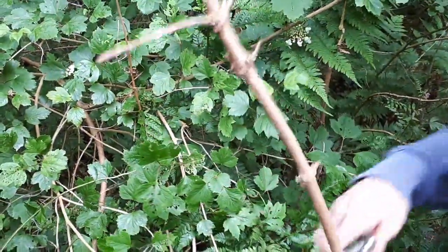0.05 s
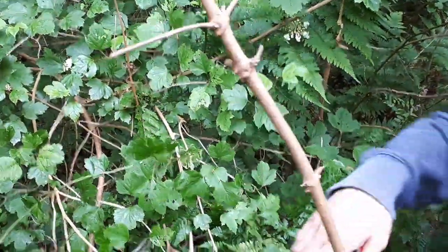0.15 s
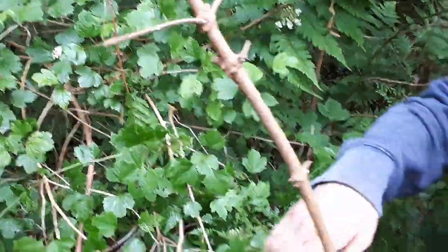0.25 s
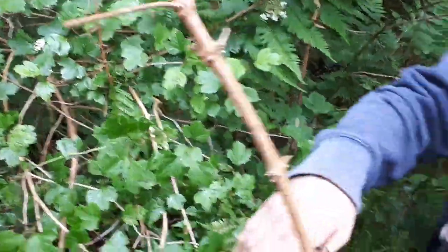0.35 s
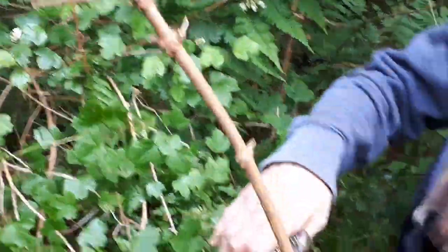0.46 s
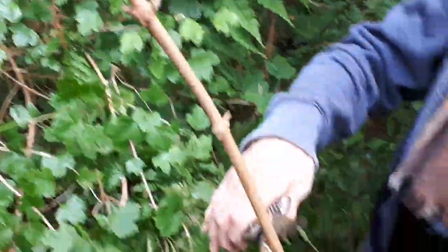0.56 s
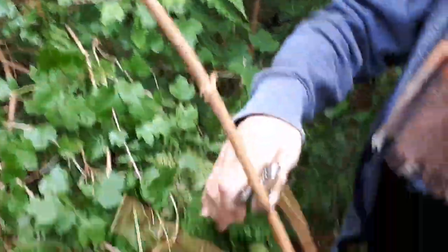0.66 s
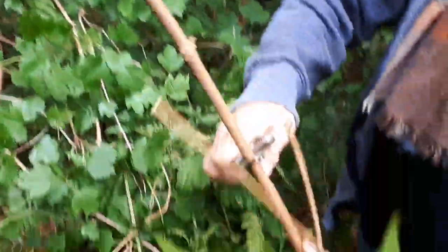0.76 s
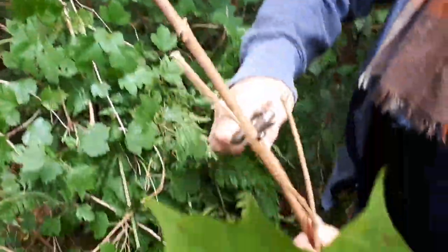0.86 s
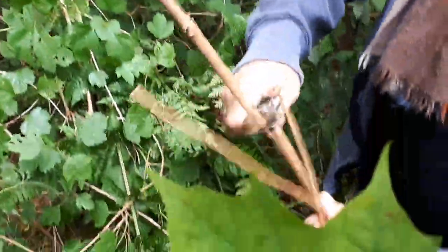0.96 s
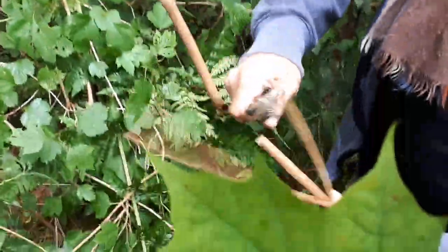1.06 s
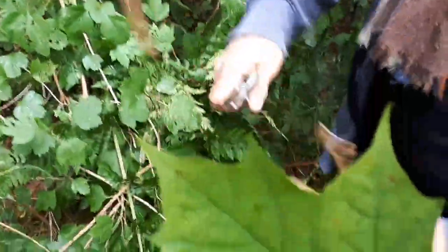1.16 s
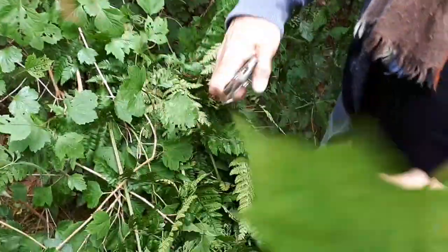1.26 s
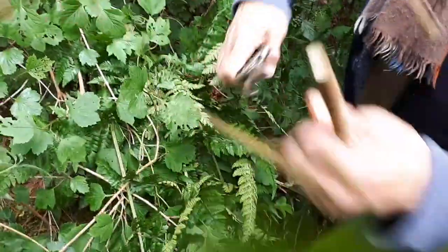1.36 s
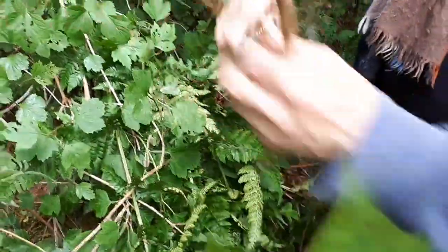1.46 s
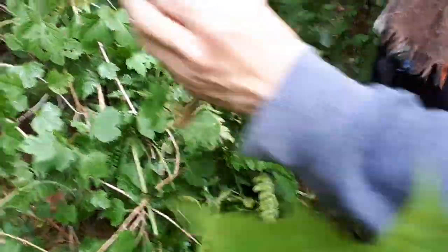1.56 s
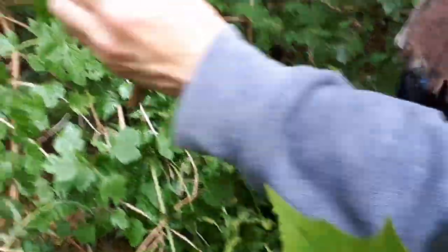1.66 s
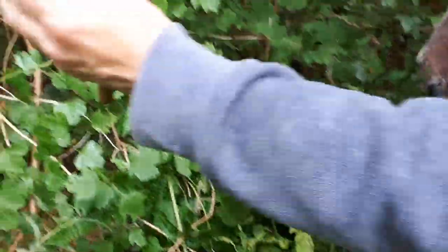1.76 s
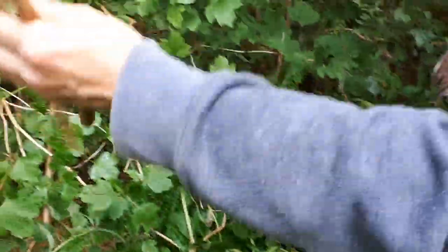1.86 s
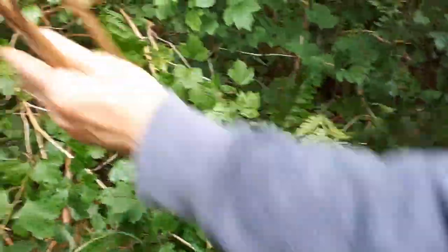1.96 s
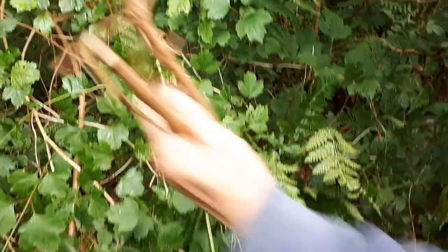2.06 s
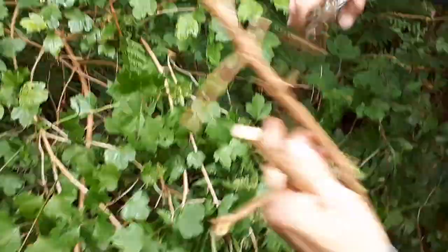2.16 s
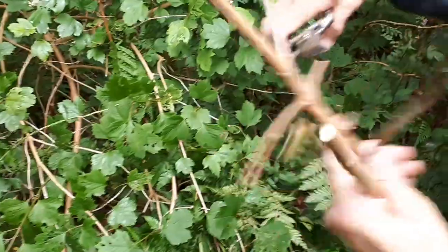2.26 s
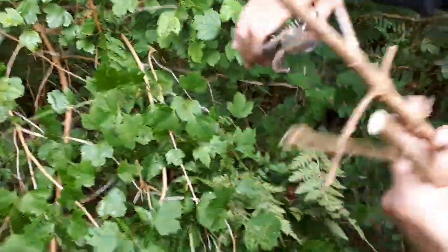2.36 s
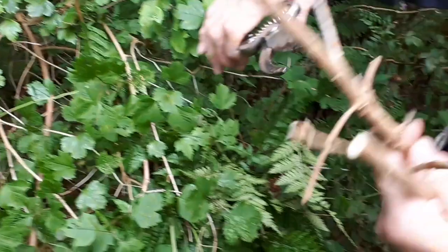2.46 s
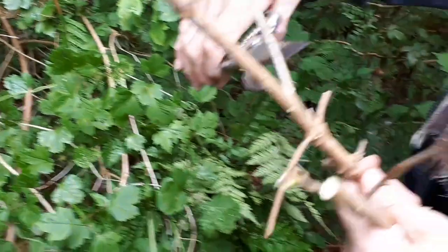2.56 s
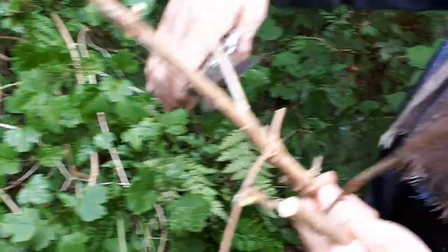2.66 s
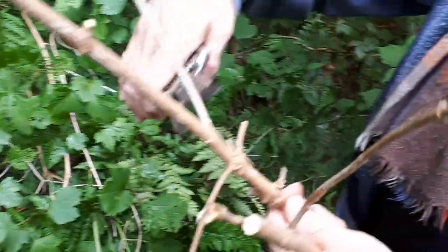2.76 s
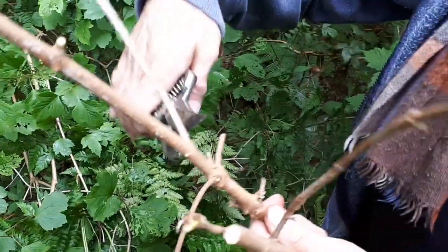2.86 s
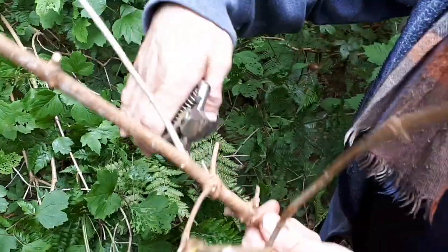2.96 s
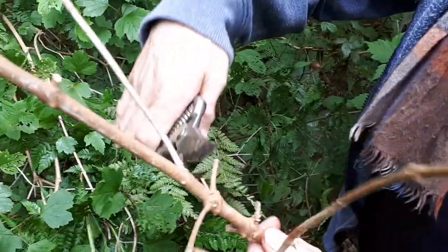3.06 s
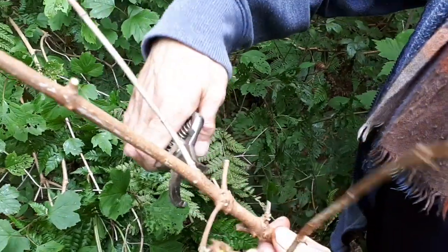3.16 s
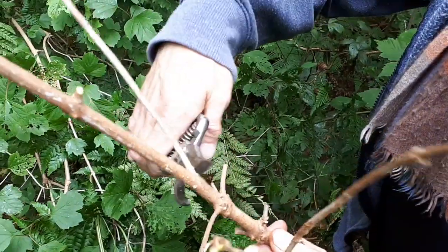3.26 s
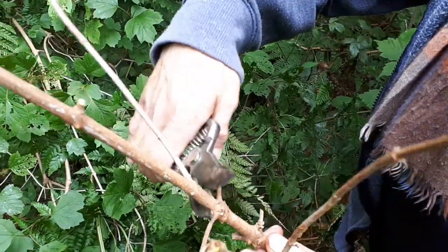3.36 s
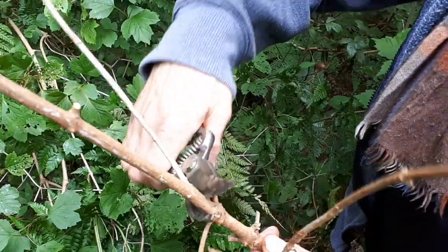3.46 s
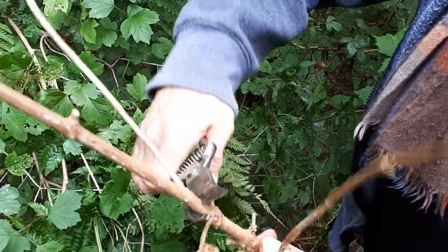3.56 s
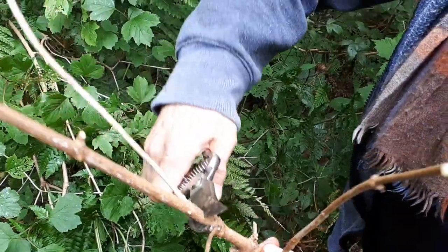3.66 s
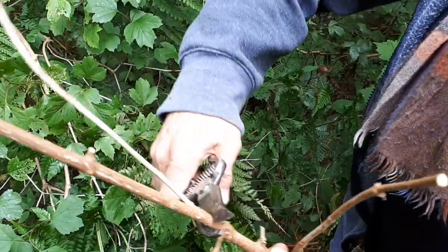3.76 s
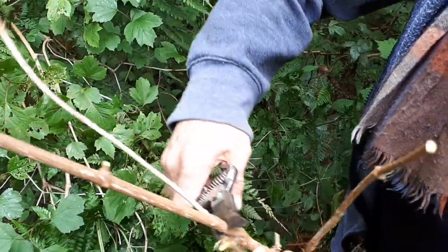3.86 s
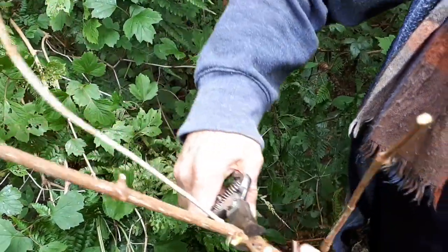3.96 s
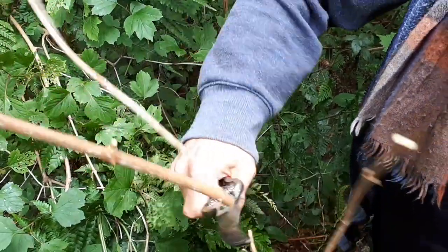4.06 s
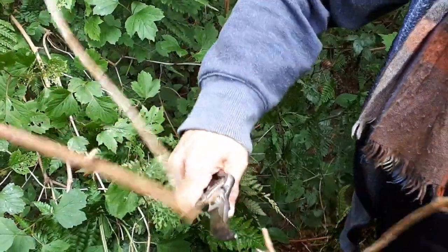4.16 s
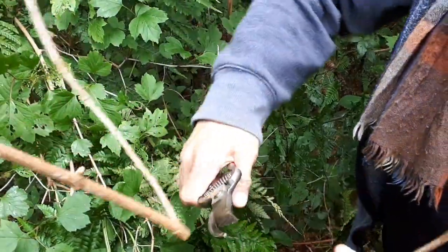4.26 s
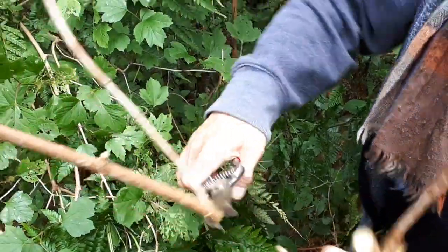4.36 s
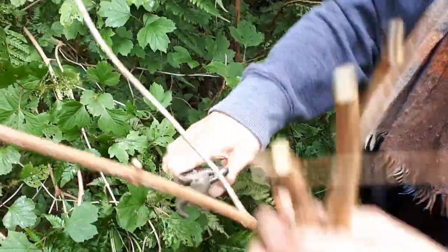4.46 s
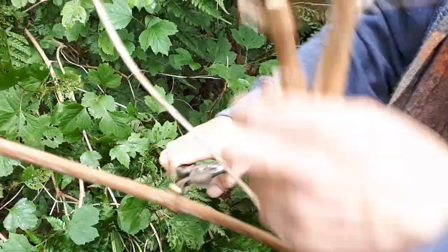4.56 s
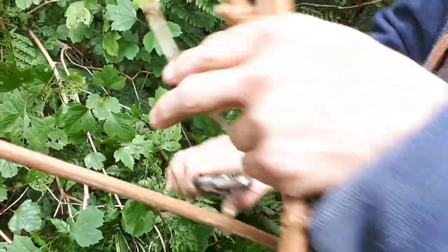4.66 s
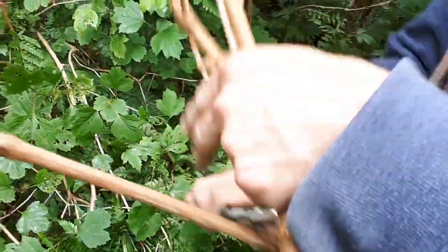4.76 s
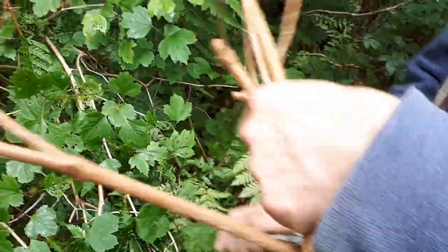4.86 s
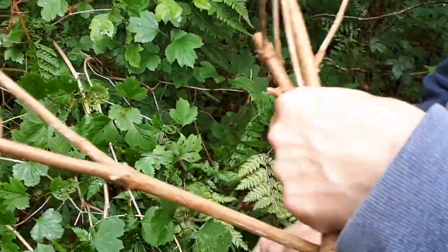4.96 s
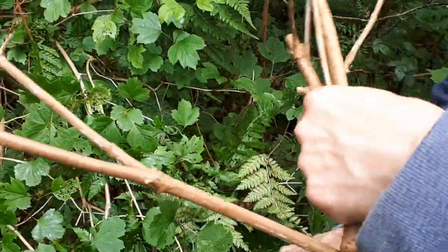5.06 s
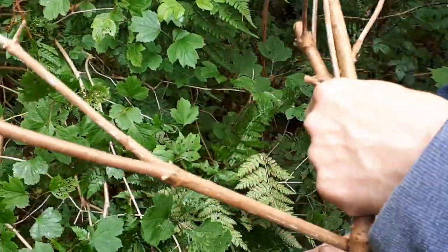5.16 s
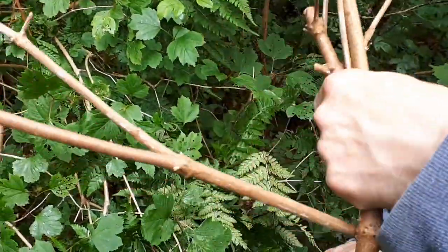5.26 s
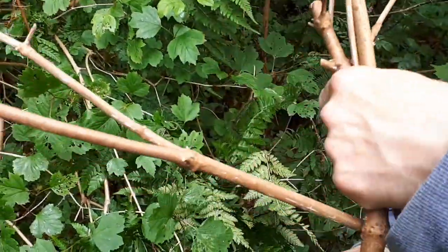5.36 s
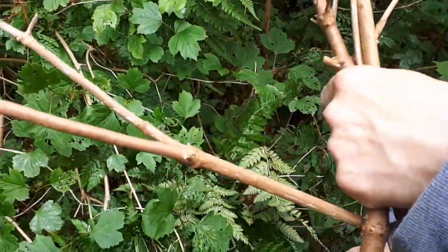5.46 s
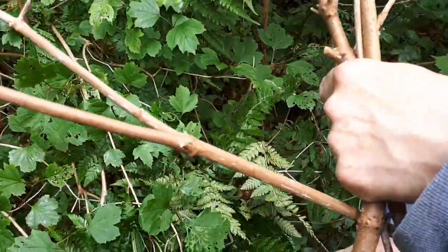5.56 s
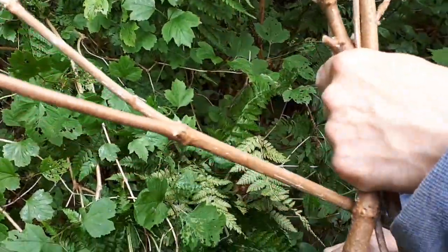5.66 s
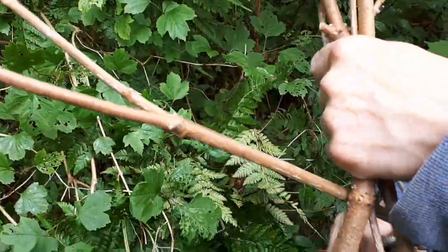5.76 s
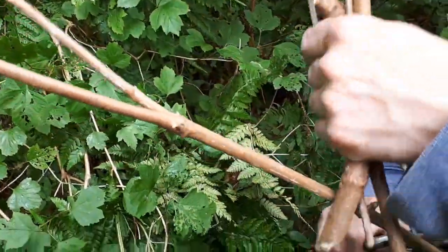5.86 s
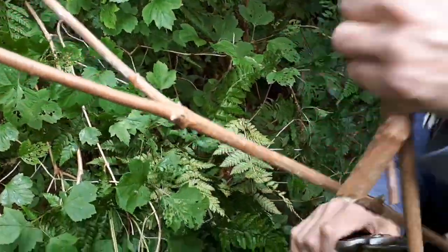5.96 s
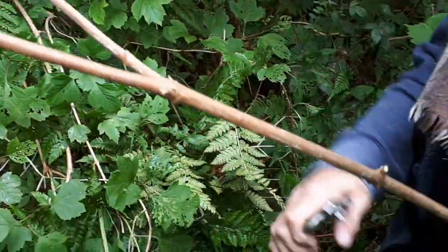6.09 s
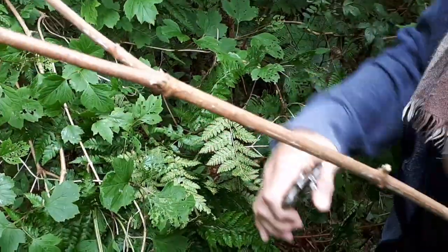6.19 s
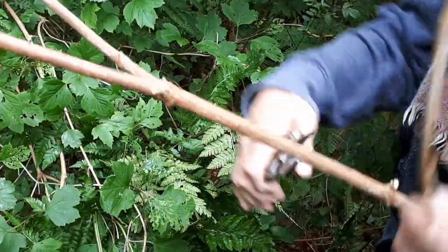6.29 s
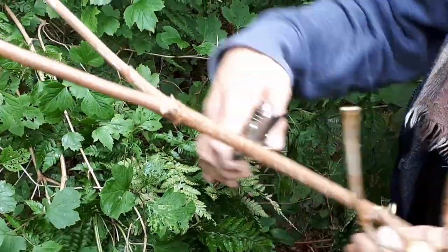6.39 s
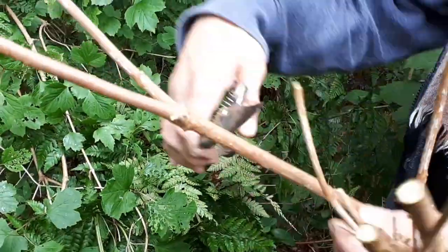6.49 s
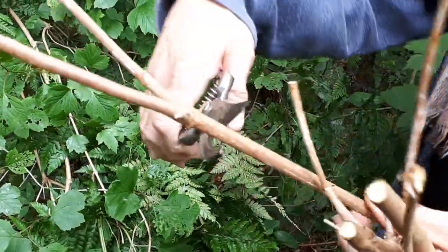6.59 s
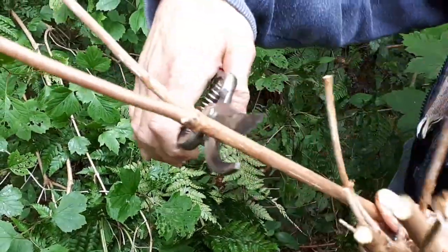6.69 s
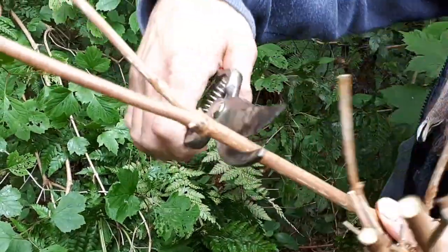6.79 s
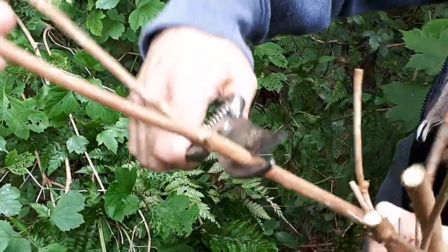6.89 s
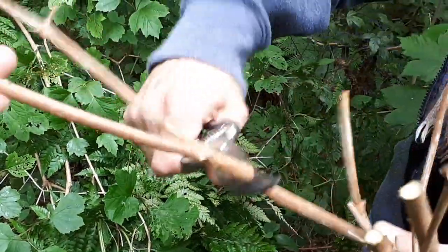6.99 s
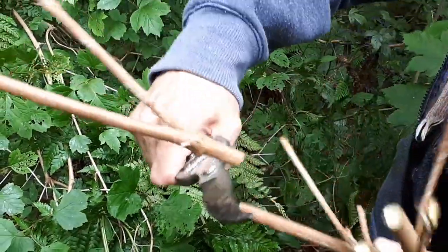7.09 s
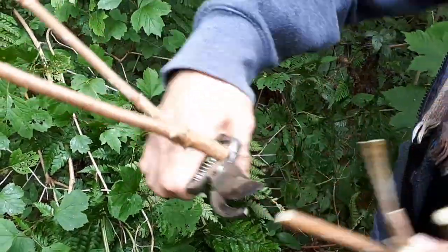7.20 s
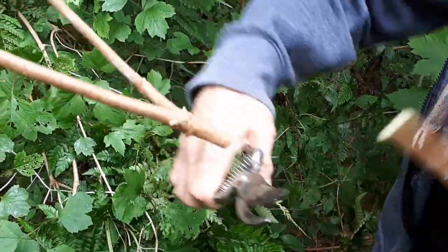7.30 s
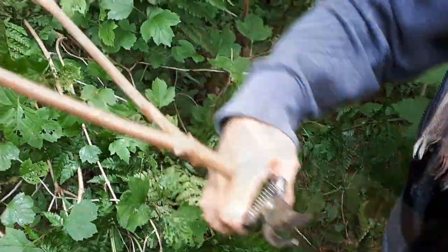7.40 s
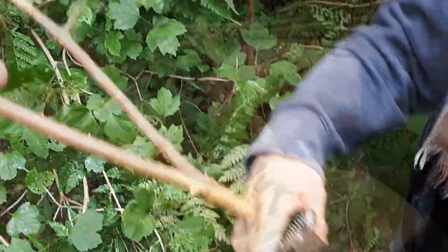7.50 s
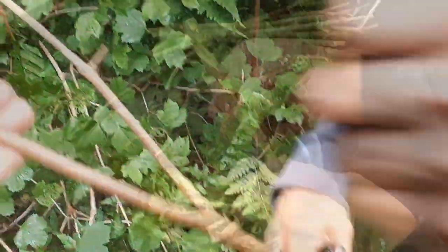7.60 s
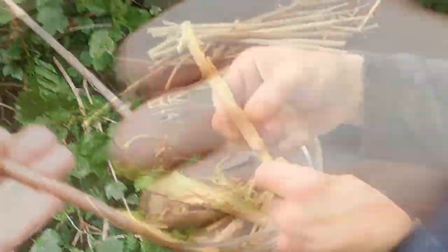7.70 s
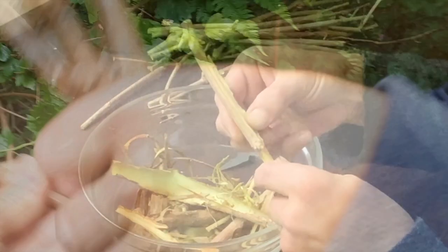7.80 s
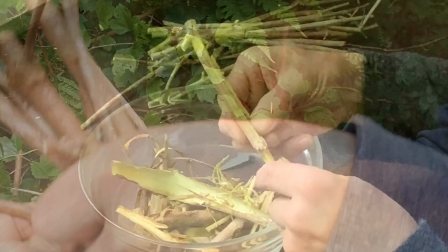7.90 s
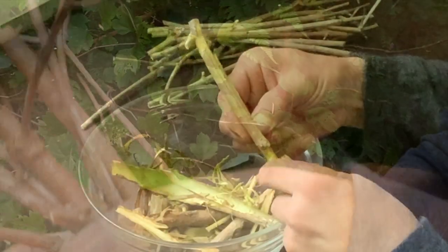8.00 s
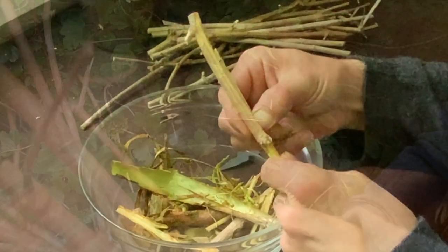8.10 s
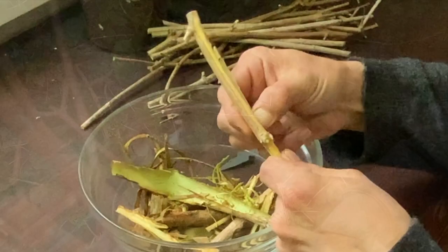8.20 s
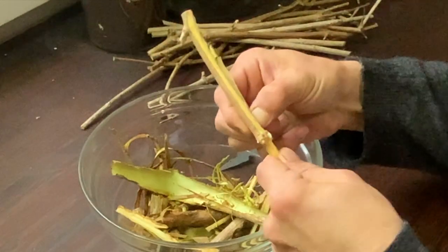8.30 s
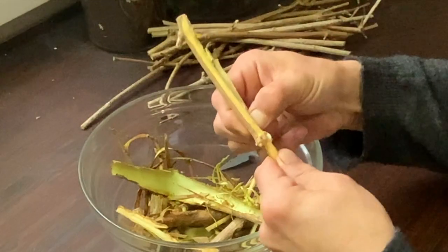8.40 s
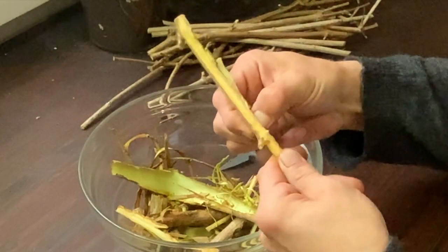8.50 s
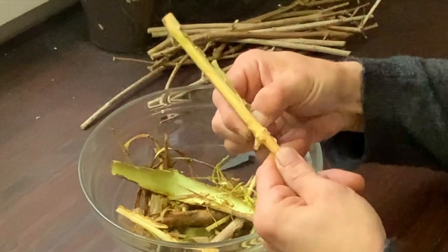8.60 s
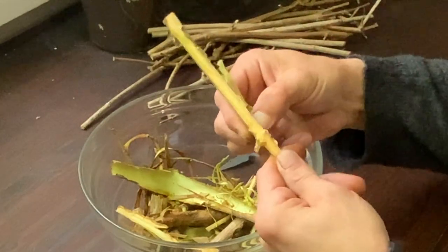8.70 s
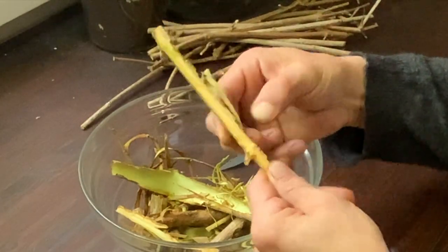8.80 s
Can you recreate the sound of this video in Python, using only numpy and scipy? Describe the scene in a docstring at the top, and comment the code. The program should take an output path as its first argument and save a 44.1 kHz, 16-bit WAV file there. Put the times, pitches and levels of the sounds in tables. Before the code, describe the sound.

Outdoors, close handheld stereo sound with a low, steady roar of a distant road and faint hiss. Leaves brush and twigs tick in the first 0.3 seconds. At 0.94 pruning shears bite through a stem: a brief tear, a loud splintering crack and a low jolt, with short woodland echo. The cut stick drops and bounces lightly at 1.2. The road swells slightly from about 2 to 3 seconds. A second strong snip comes at 3.96, dipping the background for a second. Faint thin bird calls appear from 3.4 onward. At 5.7 the steel clacks sharply with a brief ring. Twigs tick around 6.8, then a third, more splintery snip lands at 6.95. From 7.5 to 8.3 the outdoors fades into a quiet, faintly humming room. Bark peels in tiny bright snaps at 7.9 and 8.2, with a stronger woody crack at 8.49 and smaller crackles after.

```python
"""Hand shears at the wood's edge, then bark peeled indoors

Hand shears snip through shrub stems close to a hand-held camera, over the roar of a far road.
Each cut is a first bite, a swelling tear, a splintering crack and a jolt, all made of shaped noise and pulses.
Once the steel clacks and rings. Twigs tick, leaves brush past and gliding bands of noise call as far birds.
The wood fades into a quiet, humming room where bark is peeled from a stick with small, sharp cracks.
"""
import sys
import numpy as np
from scipy import signal
from scipy.io import wavfile
from scipy.ndimage import uniform_filter1d

SR = 44100
rng = np.random.default_rng(int(sys.argv[2]) if len(sys.argv) > 2 else 0)


def persist_wave(psi):
    """Save psi, clipped to +-1, as 16-bit WAV."""
    counts = np.round(np.clip(psi, -1, 1) * 32767).astype(np.int16)
    wavfile.write(sys.argv[1], SR, np.atleast_2d(counts).T)


N = 389844
TIME = np.arange(N) / SR


def amp(db):
    """Turns decibels into gain."""
    return 10 ** (np.asarray(db) / 20)


def evened(x):
    """Scales a sound to an rms level of 1."""
    return x / np.sqrt(np.mean(x ** 2) + 1e-20)


def read(points, hz):
    """Reads a table of frequencies and values, with straight lines on a log-frequency axis."""
    f, value = np.transpose(points)
    return np.interp(np.log(hz + 1), np.log(f + 1), value)


def curve(rows):
    """Draws straight lines between timed values, giving one value per sample."""
    return np.interp(TIME, *np.transpose(rows))


def panned(pan_db):
    """Gives left and right gains; positive is louder on the left."""
    return amp([[pan_db / 2], [-pan_db / 2]])


def add(mix, s, sound):
    """Mixes a sound in at time s, in seconds."""
    part = mix[:, max(round(s * SR), 0):][:, :sound.shape[-1]]
    part += sound[..., :part.shape[1]]


def convolve(x, response):
    """Passes both channels through a response."""
    return signal.oaconvolve(x, np.atleast_2d(response), axes=1)[:, :N]


def colour(x, spectrum, size=2048):
    """Filters with the given spectrum; the response has unit energy and never sounds ahead of its cause."""
    log_gain = np.log(amp(read(spectrum, abs(np.fft.fftfreq(size, 1 / SR)))))
    # minimum phase: the phase follows from the log gain
    minimum_phase = np.exp(signal.hilbert(log_gain).conj())
    response = np.fft.ifft(minimum_phase).real[:size // 2]
    return convolve(x, response / np.linalg.norm(response))


def noise(spectrum, likeness, patchy_db, size=1024):
    """Makes stereo noise of rms 1 whose level drifts in patches of time and frequency."""
    hop = size // 3
    hz = np.fft.rfftfreq(size, 1 / SR)
    a, b, c, d, patches = rng.standard_normal((5, len(hz), N // hop + 5))
    patches = uniform_filter1d(patches, size=8, axis=0)
    patches = evened(uniform_filter1d(patches, size=12, axis=1))
    same = np.clip(read(likeness, hz), -1, 1)[:, None]
    left = a + 1j * b
    right = same * left + np.sqrt(1 - same ** 2) * (c + 1j * d)
    gain = amp(read(spectrum, hz)[:, None] + patchy_db * patches)
    sound = signal.istft(np.array([left, right]) * gain, nperseg=size, noverlap=size - hop)[1]
    return evened(sound[:, :N])


def crack(ms, same, size=1500, lag_ms=.05):
    """Makes a burst of tiny fractures dying within a few ms; the part both sides share reaches the left later."""
    t_ms = np.arange(size) * 1000 / SR
    shape = np.exp(-t_ms / max(ms, .1)) * (1 - np.exp(-t_ms / 0.05))
    shared, *own = rng.standard_normal((3, size))
    shared = np.array([np.roll(shared, round(lag_ms * SR / 1000)), shared])
    same = np.clip(same, 0, 1)
    burst = shape * (np.sqrt(same) * shared + np.sqrt(1 - same) * np.array(own))
    return burst * np.linalg.norm(shape) / np.linalg.norm(burst, axis=1, keepdims=True)


def cracks(rows, same, lag_ms=0):
    """Plays a table of short cracks."""
    out = np.zeros((2, N))
    for s, db, pan_db, ms in rows:
        add(out, s, amp(db) * panned(pan_db) * crack(ms, same, lag_ms=lag_ms))
    return out


# How the roar rises and falls, before the background dips and fades.
# Each row: time in seconds, roar level in dB.
TRAFFIC_LEVEL = [(0.0, -48), (1.5, -47), (2.3, -43), (2.75, -44.5), (3.15, -40.5), (3.7, -41.2), (5.0, -41),
                 (5.45, -39), (6.1, -41.5), (6.8, -39.5), (7.4, -43)]
# Tone of the roar when the road sounds near, the same when far, and tone of the tyre rush.
# Each row: frequency in Hz, relative strength in dB per Hz.
NEAR_ROAR_TONE = [(18, -47.5), (30, -18.5), (51, -13), (75, -7.5), (92, -14), (124, -23.5), (222, -8.5),
                  (286, -5.5), (346, -9.5), (546, -13), (629, -6), (797, 0), (963, -2.5), (1200, -12.5),
                  (1300, -21), (1690, -47.5), (2860, -120)]
FAR_ROAR_TONE = [(18, -49), (30, -13.5), (49, -13), (65, -11), (81, -14.5), (128, -15.5), (310, -8.5),
                 (405, -12), (466, -7), (564, -17.5), (692, -8.5), (934, 0), (1300, -11.5), (1690, -44.5),
                 (2860, -120)]
TYRE_RUSH_TONE = [(900, -28.5), (1250, -0.5), (1550, 0.5), (1900, -9), (2500, -20.5), (3500, -32.5),
                  (5000, -38.5), (16000, -57)]
# How alike left and right are in the outdoor noises. Each row: frequency in Hz, correlation from -1 to 1.
OUTDOOR_LIKENESS = [(60, 0.96), (300, .88), (700, 0.58), (950, 0.57), (1250, -0.36), (1550, 0.13),
                    (3000, .3), (6000, .1)]
FAR_DB, NEAR_DB = -48, -43.5  # roar levels at which the road sounds almost wholly far and wholly near
RUSH_DB, RUSH_FOLLOWS = -56, 0.74  # tyre rush at NEAR_DB; dB it gains per dB of roar


def road():
    """Blends the roar of far traffic from a far to a near tone as it grows louder, with tyre rush above it."""
    roar_db = curve(TRAFFIC_LEVEL)
    near = np.clip((roar_db - FAR_DB) / (NEAR_DB - FAR_DB), .04, 1)
    near_roar = np.sqrt(near) * noise(NEAR_ROAR_TONE, OUTDOOR_LIKENESS, patchy_db=1.18, size=2048)
    far_roar = np.sqrt(1 - near) * noise(FAR_ROAR_TONE, OUTDOOR_LIKENESS, patchy_db=2.5, size=2048)
    rush = noise(TYRE_RUSH_TONE, OUTDOOR_LIKENESS, patchy_db=0.74)
    rush_db = RUSH_DB + RUSH_FOLLOWS * (roar_db - NEAR_DB)
    return panned(-0.7) * (amp(roar_db) * (near_roar + far_roar) + amp(rush_db) * rush)


# Tone of the steady hiss. Each row: frequency in Hz, relative strength in dB per Hz.
HISS_TONE = [(1500, -1), (4000, -0.5), (8000, -2.5), (13000, -.5), (16000, -0.5)]
HISS_DB = -75


def fine_hiss():
    """Makes an even, nearly white hiss behind the outdoor scene."""
    return amp(HISS_DB) * noise(HISS_TONE, OUTDOOR_LIKENESS, patchy_db=1.0)


# Leaves brushing past arm and branch; the row at 6.96 s is the trailing splintering of the third cut,
# played as the same hiss. Each row: start in seconds, length in seconds, level of the hiss in dB.
RUSTLING = [(0.0, 0.1, -55.5), (0.018, 2.16, -68.5), (0.165, 0.15, -59), (0.777, 0.15, -61.5),
            (2.05, 0.72, -70), (3.528, 0.5, -72), (5.838, 0.55, -70), (6.77, 0.49, -67), (6.96, 0.12, -51),
            (7.34, .2, -70)]
# Tone of the foliage. Each row: frequency in Hz, relative strength in dB per Hz.
LEAF_TONE = [(1500, -13.5), (3000, -4.5), (4700, 1.5), (5700, -2), (7300, 5), (8600, -7), (12000, -3.5),
             (15500, -6)]
RUSTLE_RISE, RUSTLE_FALL = .8, 2.8  # powers of a rustle's quick swell and slow trailing off
STILL_LEAVES_DB = -79  # hiss of foliage at rest


def leaves():
    """Makes soft leaf hiss; each rustle swells quickly and trails off, and the louder it is, the more it crackles."""
    power = np.full(N, amp(STILL_LEAVES_DB) ** 2)
    for s, length, db in RUSTLING:
        u = np.clip((TIME - s) / length, 0, 1)
        swell = u ** RUSTLE_RISE * (1 - u) ** RUSTLE_FALL
        power += (amp(db) * swell / swell.max()) ** 2
    level_db = 10 * np.log10(power)
    stirred = np.clip((level_db + 77) / 10, .1, 1)
    # about 300 tiny contacts a second, a few of them much stronger
    contacts = rng.random(N) < 300 / SR
    strength = amp(4.8 * np.minimum(rng.exponential(1, N), 4))
    grains = contacts * strength * rng.standard_normal((2, N))
    crackle = evened(colour(convolve(grains, crack(3.0, same=.3, size=500)), LEAF_TONE))
    hiss = noise(LEAF_TONE, OUTDOOR_LIKENESS, patchy_db=3.0)
    return amp(level_db) * panned(-1.5) * (hiss + amp(-4.0) * stirred * crackle)


# Twigs and blades touching.
# Each row: start in seconds, relative level in dB, left minus right in dB, decay time in ms.
TWIG_TICKS = [(0.09, -44.5, -6.0, 2.8), (0.1056, -49.5, -1.5, 5.9), (0.1795, -51.5, -8, 3.5),
              (0.2229, -52, -4.0, 3.0), (0.2644, -55, -3.5, 3.6), (0.437, -55, -9, 3.0),
              (0.8026, -45.5, -7.0, 3.6), (2.2494, -59, -11, 2.7), (3.5927, -59, -3.0, 4.2),
              (3.6207, -57.5, -8, 5.1), (4.827, -59.5, -2.5, 2.3), (5.9052, -54, -3, 3.3),
              (6.7518, -48, 5, 5.8), (6.768, -52.5, -13, 4.3), (6.795, -46.5, -3.5, 2.5),
              (6.851, -36.5, -4, 3.3), (6.872, -39, -6, 2.8), (7.1177, -55, 8, 3.0)]
# A cut stick drops and bounces. Each row: start in seconds, relative level in dB, decay time in ms.
STICK_BOUNCES = [(1.1816, -25, 2.2), (1.198, -35.5, 2.5), (1.212, -37, 1.1), (1.234, -51, 3),
                 (1.256, -48, 2.6), (1.287, -48, 2.1)]
# Tones of the twigs and of the falling stick. Each row: frequency in Hz, relative strength in dB.
TWIG_TONE = [(500, -22), (2000, -11.5), (4500, -3), (7500, 0), (9000, -8.5), (11500, -6.5), (16000, -8.5)]
BOUNCE_TONE = [(100, -10), (400, -0.5), (800, -6.5), (1500, -4), (2300, -5.5), (3100, -3), (4200, -14.5),
               (7000, -9.5), (9000, -24), (16000, -29)]


def twigs():
    """Makes short noise bursts for twigs ticking against the blades and for the falling stick."""
    ticks = cracks(TWIG_TICKS, same=.3)
    bounces = cracks([(s, db, 2, ms) for s, db, ms in STICK_BOUNCES], same=0.54)
    return colour(ticks, TWIG_TONE) + amp(-6.5) * colour(bounces, BOUNCE_TONE)


# Ringing modes of the shears.
# Each row: frequency in Hz, relative level in dB, time to die by 60 dB in seconds.
SHEAR_MODES = [(2395, -6, 0.09), (4000, -5, 0.13), (5038, -3.5, .05), (5940, 1.5, .045), (7000, 0, .05),
               (7496, -4, .06), (7700, -6, 0.046), (10900, -6.5, 0.08), (12100, -7, 0.17)]


def shears_ring(x, size=6000):
    """Lets blades and handles ring briefly after each blow, as a sum of dying sine waves."""
    t = np.arange(size) / SR
    ring = np.zeros(size)
    for hz, db, t60 in SHEAR_MODES:
        ring += amp(db) * np.exp(-np.log(1000) * t / t60) * np.sin(2 * np.pi * hz * t)
    return convolve(x, ring / np.linalg.norm(ring))


# Stems cut through.
# Each row: time in seconds, relative level in dB, left minus right in dB, relative jolt level in dB,
# time over which the fibres break in ms, then splintering afterwards and first bite, in dB against the level.
STEM_CUTS = [(0.9409, -4.5, -1.5, -37, 2.13, -15.5, -19.5), (3.9577, -2.5, -1, -34, 1.92, -18.5, -23.5),
             (6.9466, -4.5, -5.5, -34.5, 1.56, -10.5, -9)]
# Steel of the shears clacking.
# Each row: start in seconds, relative level in dB, left minus right in dB, decay time in ms.
STEEL_CLACKS = [(5.666, -41.5, -0.5, 3.9), (5.702, -36.5, 0, 2.8), (5.7312, -20.5, -2.5, 3.3),
                (5.7397, -1, -2.5, 0.99), (5.7495, -9.5, -8, 0.61)]
# Tones of the torn stem and of the steel. Each row: frequency in Hz, relative strength in dB.
STEM_TONE = [(240, -31), (400, 1.5), (588, -10), (906, -1), (1350, -12), (1760, -4.5), (1900, -10),
             (2050, -4.5), (4950, -1), (7990, -3.5), (9320, -13.5), (11900, -3), (13100, -7.5), (15300, -8),
             (16000, -14.5)]
STEEL_TONE = [(590, -41.5), (1000, -12.5), (1750, -22), (2230, -4), (2560, -17), (2910, -12), (3620, -19.5),
              (5190, -10.5), (5900, 1.5), (7020, -11.5), (7620, -2.5), (8260, -17), (9490, -22),
              (11400, -10), (16000, -27.5)]


def shears():
    """Bites, tears with a swelling burst until the stem gives way, and splinters; bare steel clacks."""
    fibres = np.zeros((2, N))
    for s, db, pan_db, _, ms, splinter_db, bite_db in STEM_CUTS:
        bite = crack(0.75, same=0.2)
        add(fibres, s - .0044, amp(db + bite_db) * bite)
        # a burst played backwards swells up to the break
        tearing = crack(3.4, same=0.22)[:, ::-1]
        add(fibres, s + 0.0011 - tearing.shape[1] / SR, amp(db - 21.5) * tearing)
        breaking = crack(ms, same=0.53, lag_ms=0)
        add(fibres, s + .0007, amp(db - 4.5) * panned(pan_db) * breaking)
        splinters = crack(5.5, same=0.18)
        add(fibres, s + 0.0043, amp(db + splinter_db) * splinters)
    steel = amp(-3.0) * cracks(STEEL_CLACKS, same=0.37, lag_ms=0.11)
    steel += amp(-8.0) * np.roll(steel, round(.0036 * SR), axis=1)  # thrown back by the hand
    ring = amp(-14) * shears_ring(fibres + steel)
    return colour(fibres, STEM_TONE) + colour(steel, STEEL_TONE) + ring


def jolt(width_ms, low_hz, size=2000):
    """Makes a pull and a rebound with a soft backswing, centred 4 ms after its start."""
    u = (np.arange(size) * 1000 / SR - 4) / width_ms
    low_cut = signal.butter(1, low_hz, "high", fs=SR)
    push = signal.lfilter(*low_cut, u * np.exp(-u ** 2 / 2))
    return push / abs(push).max()


def jolts():
    """Kicks the camera at each cut, mostly on the right; the dropped stick thuds at each bounce."""
    out = np.zeros((2, N))
    for s, _, _, db, *_ in STEM_CUTS:
        add(out, s - .0018, amp(db + 14.0) * panned(-13.5) * jolt(width_ms=0.88, low_hz=50))
    for s, db, _ in STICK_BOUNCES:
        add(out, s - .0028, amp(db - 8.5) * jolt(width_ms=0.76, low_hz=130))
    return out


DIP_DB, DIP_FALL_S, DIP_RETURN_S = -5, 0.23, 0.19
DIP_HOLD_S = 1.114  # from the cut to the start of the return


def dip():
    """Gives the gain of road and hiss: it sinks after each cut, stays low and comes back."""
    since = TIME - np.array(STEM_CUTS)[:, :1]
    fallen = np.clip(since / DIP_FALL_S, 0, 1)
    returned = np.clip((since - DIP_HOLD_S) / DIP_RETURN_S, 0, 1)
    return amp(DIP_DB * (fallen - returned).max(0))


# Far birds. Each row: start in seconds, length in seconds, start pitch in Hz, end pitch in Hz,
# width of the band in Hz, level in dB.
BIRD_CALLS = [(3.39, 0.037, 4280, 4360, 121, -71), (3.67, 0.19, 4450, 4350, 300, -76),
              (4.369, 0.2, 7720, 7430, 200, -83.5), (5.299, 0.28, 5300, 4300, 252, -74.5),
              (5.93, 0.47, 7230, 7000, 400, -76), (7.04, .48, 5010, 4750, 400, -80.5),
              (7.117, 0.22, 6900, 6850, 252, -79), (7.47, 0.28, 6360, 6500, 200, -84.5)]


def birds():
    """Makes thin gliding calls, blurred into narrow bands by the trees."""
    out = np.zeros((2, N))
    for s, length, start_hz, end_hz, width_hz, db in BIRD_CALLS:
        n = int(length * SR)
        # slow complex noise widens the pure glide into a band
        wander = rng.standard_normal((2, n)) + 1j * rng.standard_normal((2, n))
        blur = signal.lfilter(*signal.butter(2, width_hz / 2, fs=SR), wander)
        glide = np.exp(2j * np.pi * np.cumsum(np.linspace(start_hz, end_hz, n)) / SR)
        call = (blur * glide).real
        add(out, s, amp(db) * evened(call * np.hanning(n)))
    return out


# Tone of the quiet room. Each row: frequency in Hz, relative strength in dB per Hz.
ROOM_TONE = [(20, -6), (50, -5), (75, -8), (150, -6), (400, -13), (1500, -18.5), (5000, -25),
             (16000, -18.5)]
ROOM_DB = -77.5
HUM_HZ, HUM_DB = 49.5, -76  # electric hum, peak level


def room_tone():
    """Fades in the noise of the quiet room, with a low electric hum as a sine wave."""
    hum = amp(HUM_DB) * np.sin(2 * np.pi * HUM_HZ * TIME)
    air = amp(ROOM_DB) * noise(ROOM_TONE, [(60, 0.9), (1000, 0.29)], patchy_db=3.0)
    fade_in = np.clip((TIME - 7.4) / 0.85, 0, 1)
    return fade_in * (hum + air)


FADE_START_S, FADE_END_S, FADE_POWER = 7.51, 8.32, 1.49


def wood_fade():
    """Gives the gain of the wood's background as it gives way to the room."""
    return np.clip((FADE_END_S - TIME) / (FADE_END_S - FADE_START_S), 0, 1) ** FADE_POWER


# Bark letting go of the stick. Each row: start in seconds, relative level in dB, left minus right in dB,
# decay time in ms, low edge in Hz (the finer the fibre, the higher).
BARK_SNAPS = [(7.825, -64.5, 1, 8, 7950), (7.845, -56, 0, 1.45, 8000), (7.9248, -25, -2, 0.38, 14000),
              (7.9694, -52.5, 0, 6.8, 6000), (8.106, -67, 2, 8.8, 9000), (8.2078, -34.5, 3.5, 1.5, 3500),
              (8.219, -50.5, 3, 1.4, 5000), (8.466, -48, 6, 1.4, 1987), (8.4891, -10.5, 1, 1.44, 296),
              (8.4995, -32, -4, 1.2, 2000), (8.5216, -23, -5, .8, 5000), (8.541, -19, -1, 1.95, 4000),
              (8.547, -37, -1, 1, 5000), (8.7132, -56, 1, 10, 1990), (8.797, -62, 5, 10, 3010),
              (8.818, -59, 0, 10, 6000)]
# The stick itself sounding in the hands.
# Each row: start in seconds, relative level in dB, middle pitch in Hz, time to die by 60 dB in seconds.
STICK_RINGS = [(8.303, -53, 1055, 0.059), (8.303, -62, 696, .06), (8.305, -58.5, 409, 0.15),
               (8.4666, -57, 3240, 0.1), (8.4885, -22, 2660, 0.012), (8.4887, -41, 695, 0.044),
               (8.7132, -63.5, 2780, 0.044), (8.797, -65, 3000, .05)]
# Tone of the bark. Each row: frequency in Hz, relative strength in dB.
BARK_TONE = [(300, -52), (1400, -14), (2600, -7.5), (4200, -14.5), (7000, -9), (11500, -2.5), (13500, -1),
             (16000, -8.5)]


def peeling(size=5000):
    """Snaps bark fibres as bright noise bursts; some tugs also sound the stick as short, close modes."""
    fibres, stick = np.zeros((2, N)), np.zeros((2, N))
    for s, db, pan_db, ms, low_hz in BARK_SNAPS:
        low_cut = signal.butter(1, min(low_hz, 15000), "high", fs=SR)
        snap = signal.lfilter(*low_cut, crack(ms, same=0.33, lag_ms=.2))
        add(fibres, s, amp(db - 2.0) * panned(pan_db) * snap)
    t = np.arange(size) / SR
    for s, db, hz, t60 in STICK_RINGS:
        # a damp stick has a cluster of close, short modes
        mode_hz = hz * np.linspace(.87, 1.13, num=5)[:, None]
        cluster = np.sin(2 * np.pi * (mode_hz * t + rng.random((2, 5, 1)))).sum(1)
        shape = np.exp(-np.log(1000) * t / t60) * (1 - np.exp(-t / 0.00038))
        add(stick, s, amp(db - 5.5) * evened(cluster + cluster.mean(0)) * shape)
    return colour(fibres, BARK_TONE) + stick


def echoes(x, t60, rise_s, size=256):
    """Makes countless reflections: each band's power lingers and dies at its own speed, as fresh noise."""
    frame = dict(nperseg=size, noverlap=size // 2)
    hz, t, z = signal.stft(x.sum(0) / np.sqrt(2), SR, **frame)
    power = uniform_filter1d(abs(z) ** 2, size=5, axis=0)
    t = t[t < .7]
    rise = 1 - np.exp(-(t / rise_s) ** 2)
    decay = (amp(-60 * t / read(t60, hz)[:, None]) * rise) ** 2
    decay /= decay.sum(1, keepdims=True)
    lingering = abs(signal.fftconvolve(power, decay, axes=1)[:, :z.shape[1]])
    scatter = signal.stft(rng.standard_normal((2, N)), SR, **frame)[2]
    return signal.istft(scatter / scatter.std() * np.sqrt(lingering), SR, **frame)[1][:, :N]


# How long near echoes in the wood, far trees and the room linger.
# Each row: frequency in Hz, time to die by 60 dB in seconds.
WOOD_DECAY = [(200, 0.18), (1000, 0.34), (2500, 0.25), (7000, 0.1), (12000, 0.21), (16000, .16)]
TREES_DECAY = [(200, .5), (2500, 0.78), (7000, 0.46), (10000, .33), (16000, .28)]
ROOM_DECAY = [(300, 0.27), (2500, 0.26), (8000, 0.25), (12000, 0.19), (16000, 0.15)]


def scene():
    """Plays the wood with its scattered echoes, then the small room."""
    cutting = shears() + twigs()
    near_echoes = amp(-12) * echoes(cutting, WOOD_DECAY, rise_s=0.0027)
    tree_echoes = amp(-29.0) * echoes(cutting, TREES_DECAY, rise_s=0.037)
    outdoors = cutting + near_echoes + tree_echoes
    background = wood_fade() * (dip() * (road() + fine_hiss()) + leaves())
    bark = peeling()
    indoors = bark + amp(-4.5) * echoes(bark, ROOM_DECAY, rise_s=0.0011) + room_tone()
    return outdoors + jolts() + background + birds() + indoors


LOW_CUT_HZ, EDGE_HZ = 28, 16000


def record(dry):
    """Applies the recorder's low cut and upper band limit."""
    low_cut = signal.butter(2, LOW_CUT_HZ, "high", fs=SR, output="sos")
    dry = signal.sosfilt(low_cut, dry)
    band_limit = signal.firwin(255, EDGE_HZ, window=("kaiser", 8), fs=SR)
    return signal.oaconvolve(dry, band_limit[None], "same")


dry = scene()
out = record(dry)
persist_wave(out)
```